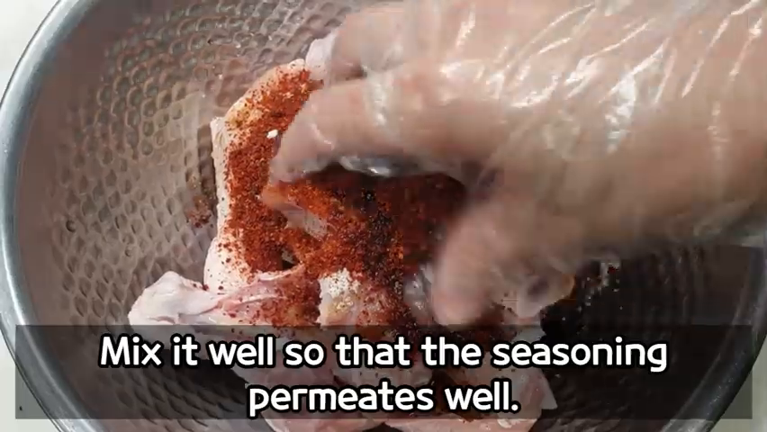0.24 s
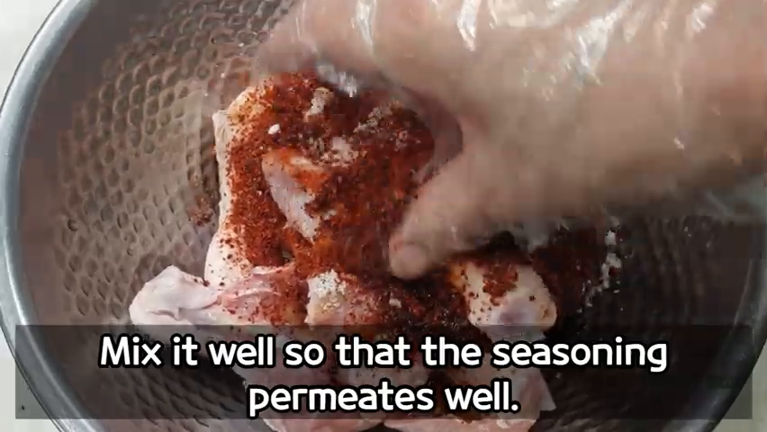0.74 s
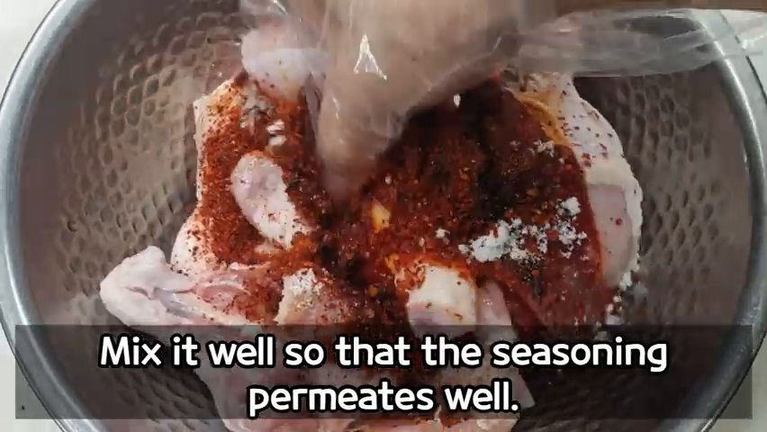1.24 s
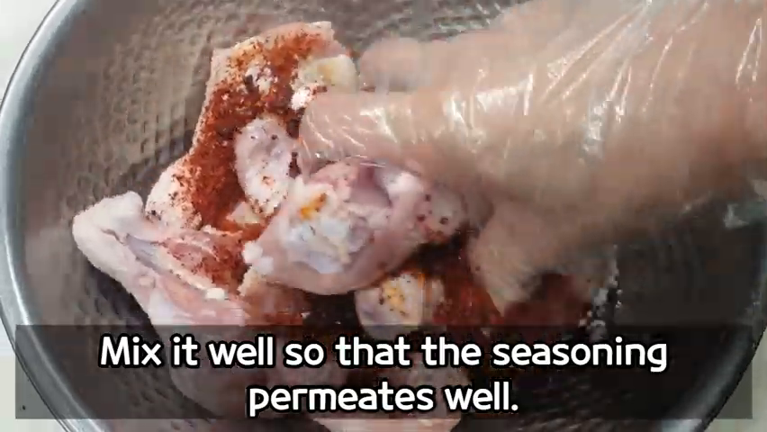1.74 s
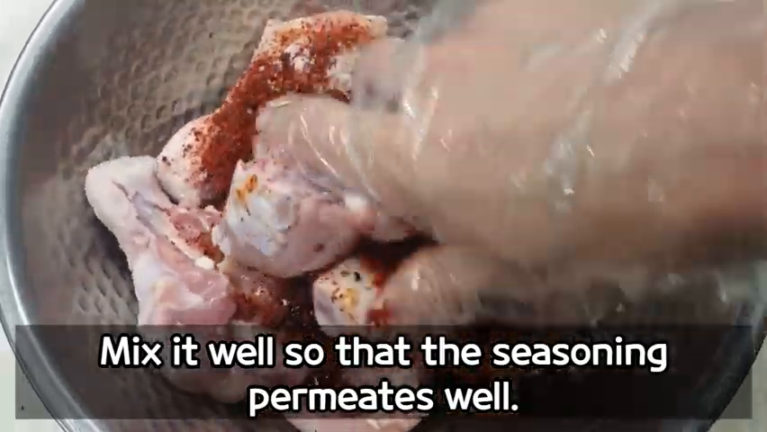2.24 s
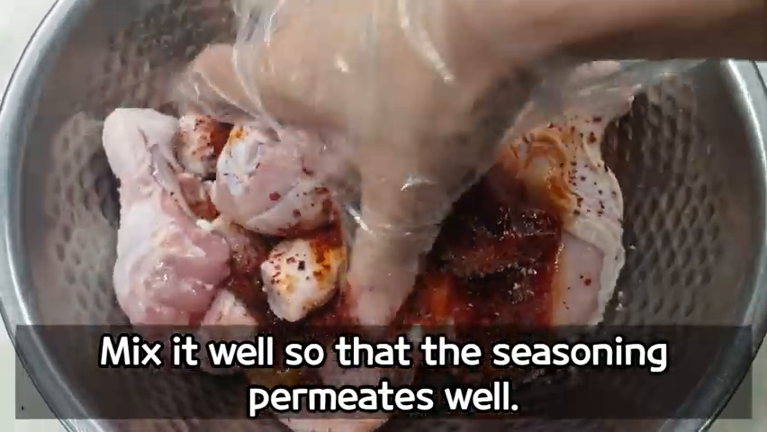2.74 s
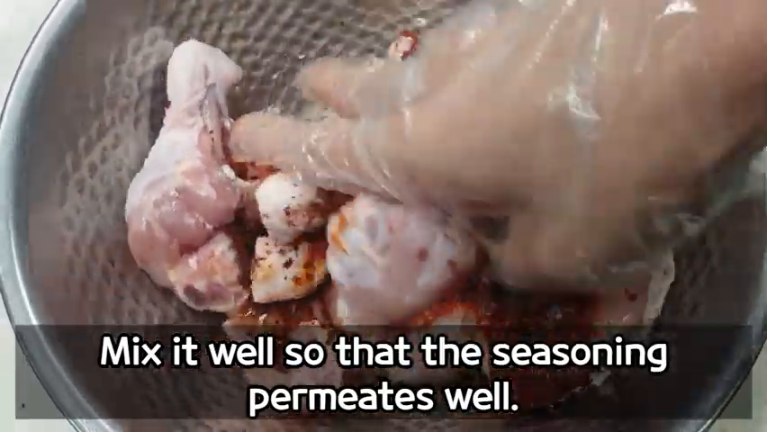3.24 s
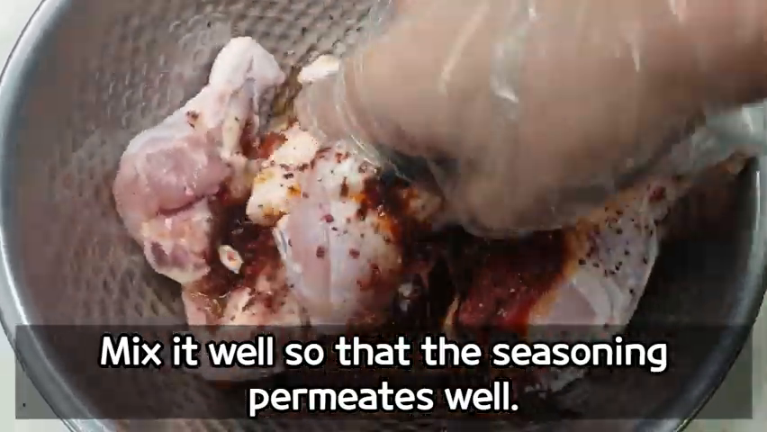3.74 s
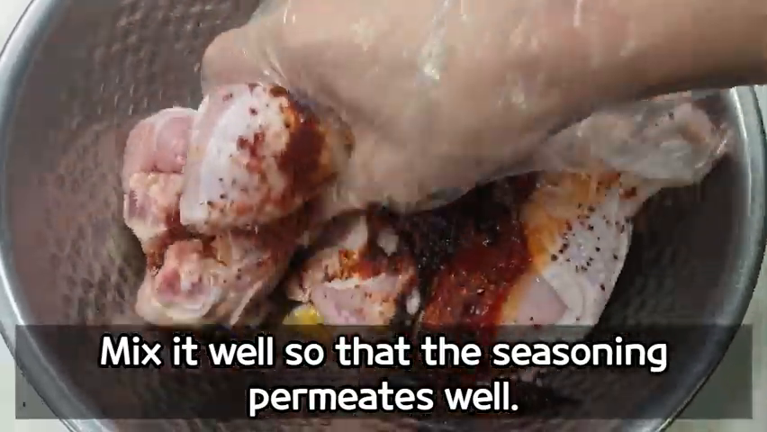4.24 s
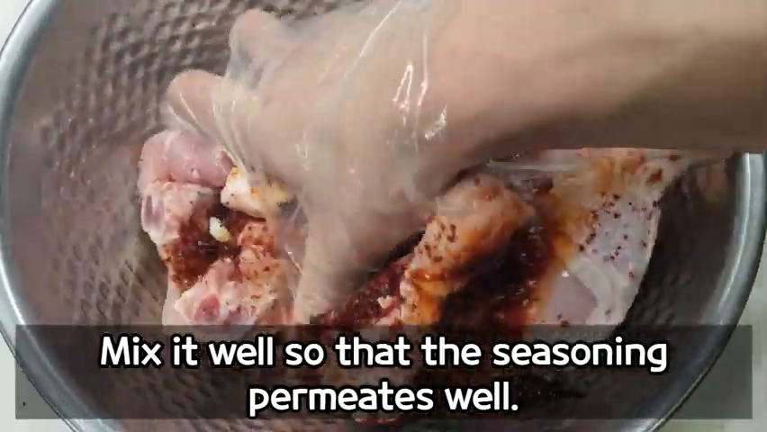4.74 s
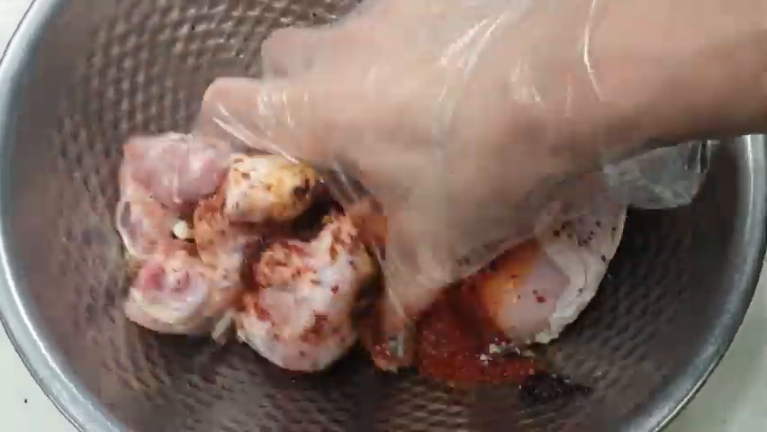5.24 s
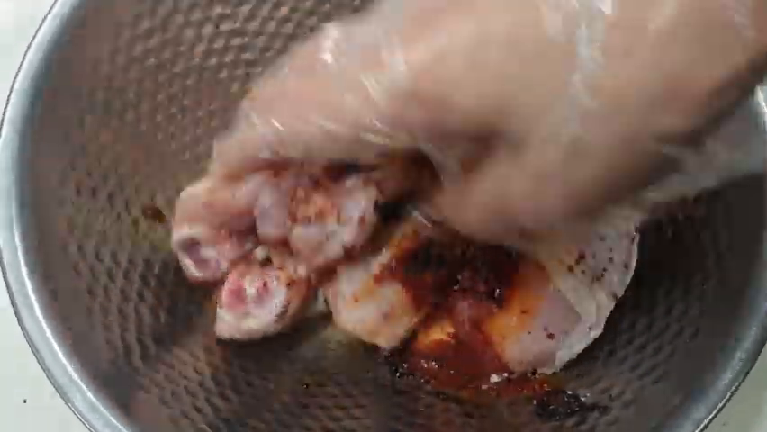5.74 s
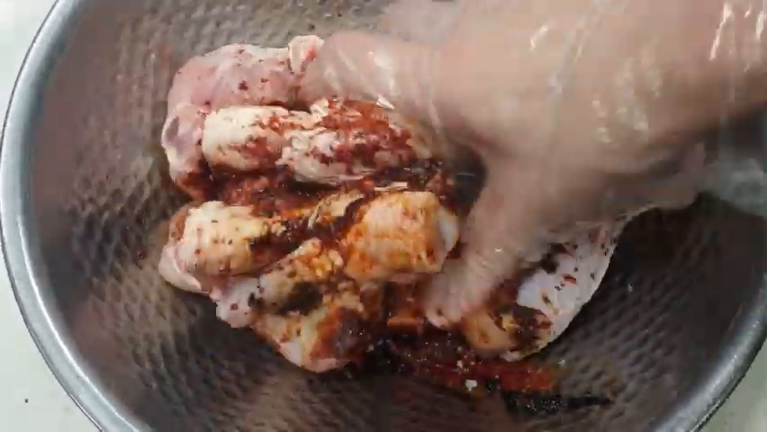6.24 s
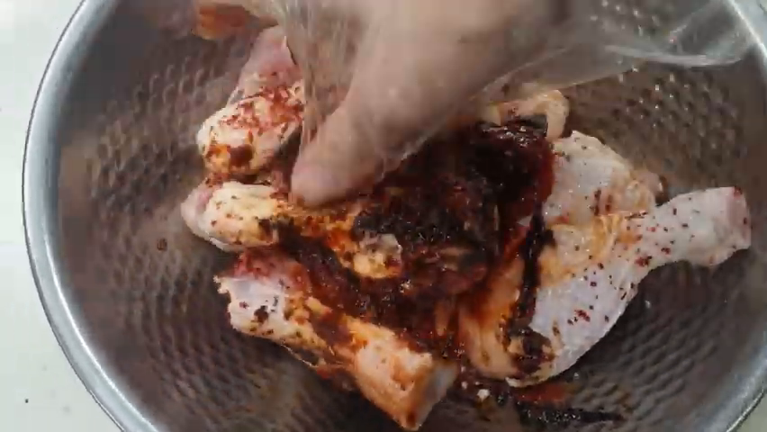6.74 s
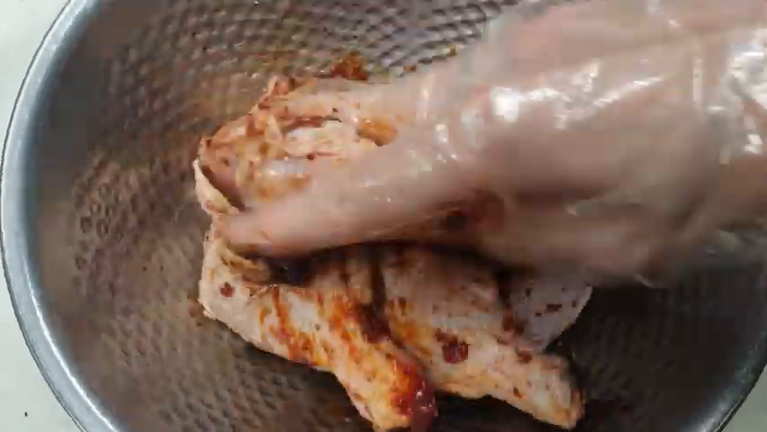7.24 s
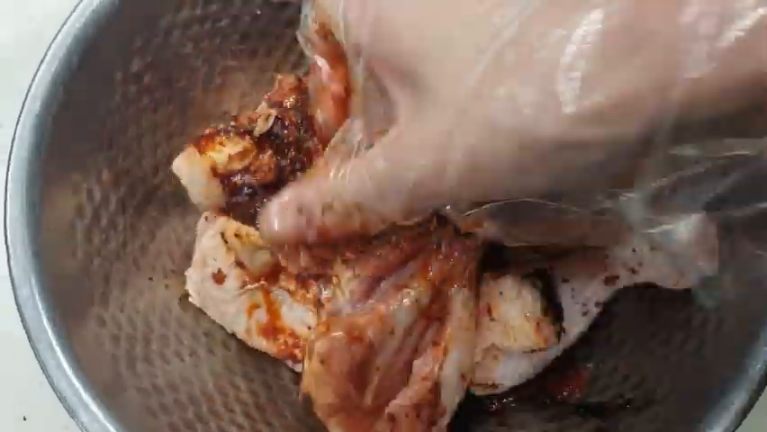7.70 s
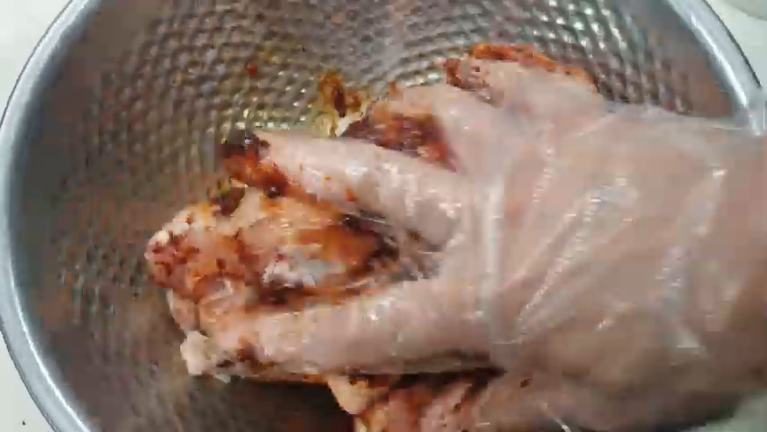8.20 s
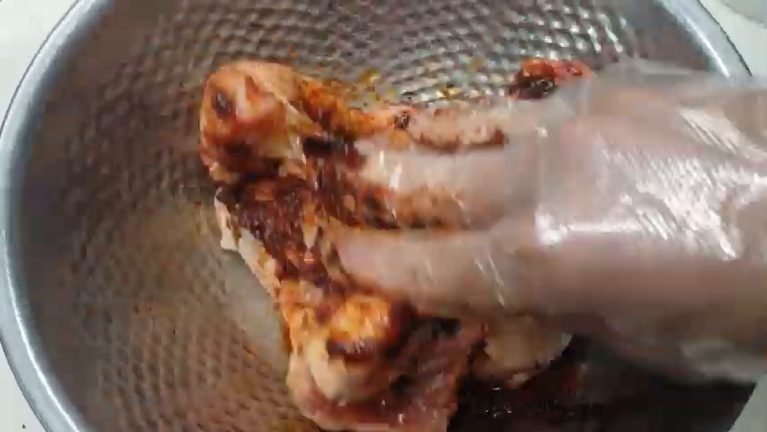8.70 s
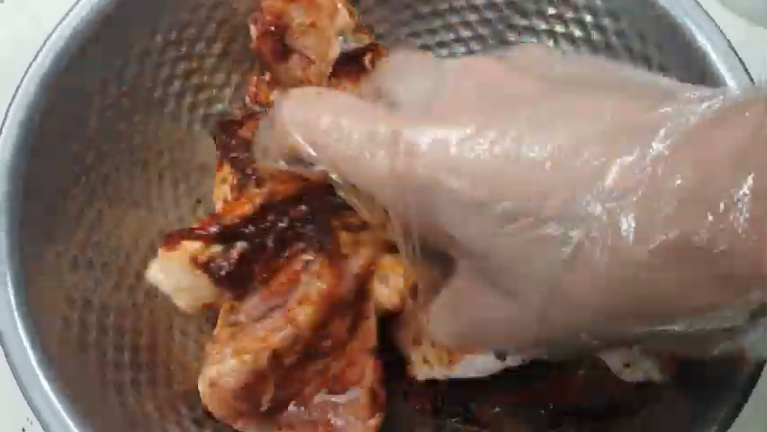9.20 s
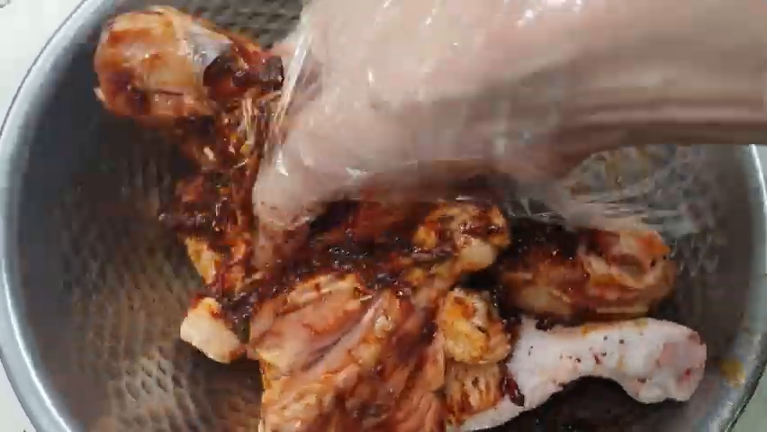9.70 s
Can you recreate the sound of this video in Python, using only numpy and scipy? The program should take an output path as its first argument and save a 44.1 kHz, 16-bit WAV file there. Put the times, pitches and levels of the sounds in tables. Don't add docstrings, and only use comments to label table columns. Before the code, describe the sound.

A plastic-gloved hand kneads raw chicken and wet paste in a steel bowl, with bright crinkling, squelches, smacks and soft low thumps, heard close up.

```python
import sys
import numpy as np
from scipy import signal
from scipy.fft import rfft, irfft
from scipy.io import wavfile
from scipy.ndimage import uniform_filter1d

SR = 44100
rng = np.random.default_rng(int(sys.argv[2]) if len(sys.argv) > 2 else 0)


def volts_from_db(level):
    exponent = np.asarray(level, float) / 20
    return 10 ** exponent


def waveform_to_disk(signal):
    frames = np.transpose(np.atleast_2d(signal))
    scaled = np.clip(frames, -1, 1) * 32767
    samples = np.round(scaled).astype(np.int16)
    wavfile.write(sys.argv[1], SR, samples)


N = 439236

# pitch_hz, likeness (1 = the same)
LIKENESS = [(60, 0.8), (300, 0.8), (540, 0.62), (880, 0.93), (1500, 0.2), (7500, 0.08), (9000, 0.4),
            (15500, 0.12)]
# time_s, crinkle_db
EFFORT = [(0.0, -50.5), (0.6, -53.5), (1.4, -47.5), (2.0, -41), (3.0, -38), (4.0, -38.5), (5.0, -39.5),
          (6.0, -44), (7.0, -38), (8.0, -40.5), (9.0, -42.5), (9.96, -48)]
# peak_s, peak_db, pitch_hz
THUMPS = [(1.197, -31, 101), (2.373, -35.5, 103), (2.829, -35, 92.5), (2.879, -28, 110), (3.417, -28, 112),
          (3.49, -23, 98), (3.541, -30.5, 100), (3.645, -29.5, 102), (4.021, -18, 123.4), (4.049, -18, 100),
          (4.089, -25, 127), (4.581, -23, 119), (4.64, -21.5, 124), (4.838, -25.5, 100), (5.146, -25.5, 97),
          (5.505, -23.5, 97), (5.775, -21.5, 109), (6.248, -33.5, 91), (6.614, -27.5, 105),
          (6.779, -30, 95), (7.021, -28.5, 98), (7.054, -23.5, 103.5), (7.356, -20.5, 119.4),
          (7.57, -30.5, 109), (7.633, -29.5, 92), (7.822, -19.5, 100), (8.564, -28.5, 100),
          (8.874, -26, 95), (9.103, -27.5, 108.4), (9.637, -24.5, 95.7)]
# peak_s, peak_db
SOFT_THUMPS = [(0.962, -38.5), (7.472, -42), (1.051, -38.5), (1.233, -34), (2.799, -34.5), (2.913, -32.5),
               (3.073, -34), (3.208, -41.5), (3.456, -31), (3.602, -31), (4.137, -34), (4.223, -36),
               (4.622, -30), (4.671, -34), (4.787, -29.5), (5.212, -37), (5.625, -41), (5.795, -32),
               (5.979, -39), (6.232, -36), (6.537, -38), (6.854, -38), (6.967, -38), (7.195, -36), (7.262, -36),
               (7.292, -36), (7.324, -32), (2.436, -40), (7.765, -32.5), (9.555, -30.5), (0.272, -52),
               (0.381, -45), (0.92, -44), (1.671, -53), (1.799, -45), (1.95, -50), (2.06, -45), (4.53, -46),
               (6.58, -43), (8.528, -45), (8.599, -44), (8.84, -46), (9.93, -48), (4.75, -38), (4.816, -31),
               (4.873, -30), (4.9, -42), (4.93, -50), (4.701, -39), (5.735, -42), (5.25, -50)]


def at_samples(rows):
    s, *columns = np.transpose(rows)
    return [np.interp(np.arange(N) / SR, s, c) for c in columns]


def at_hz(points, hz):
    table_hz, value = np.array(points).T
    return np.interp(np.log(hz), np.log(table_hz), value)


def rms_one(x):
    return x / np.sqrt(np.mean(x ** 2) + 1e-20)


def mid_rms_one(stereo):
    return stereo / np.sqrt(np.mean(stereo.mean(axis=0) ** 2))


def two_sides(mid, side, alike):
    return np.sqrt(1 + alike) * mid + np.sqrt(1 - alike) * side * [[1], [-1]]


def power_db(*levels_db):
    return 10 * np.log10(sum(volts_from_db(db) ** 2 for db in levels_db))


def add(out, s, sound):
    i = max(round(s * SR), 0)
    out[..., i:i + sound.shape[-1]] += sound[..., :N - i]


def grains(per_s, spread_db, t60):
    place, size = rng.random((2, 4000))[:, :min(round(per_s * N / SR), 4000)]
    bursts = np.full(N, 1e-18)
    bursts[(place * N).astype(int)] = volts_from_db(spread_db * np.minimum(-np.log(1 - size), 2.5))
    fall = volts_from_db(-60 / (t60 * SR))
    swell = volts_from_db(-60 / (0.85 * t60 * SR))
    return rms_one(signal.lfilter([1], np.convolve([1, -fall], [1, -swell]), bursts))


def bands(spectrum, low_hz, top_hz, shared, own_share, per_s, spread_db, cycles, smooth, per_octave=3):
    count = int(per_octave * np.log2(top_hz / low_hz))
    edges = np.geomspace(low_hz, top_hz, count + 1)
    white = rng.standard_normal((2, 2, N))
    out = 0
    for k, (low, high) in enumerate(zip(edges, edges[1:])):
        band = signal.butter(2, [low, high], "band", fs=SR, output="sos")
        mid, side = signal.sosfilt(band, white[k % 2])
        hz = np.sqrt(low * high)
        alike = np.clip(at_hz(LIKENESS, hz), -1, 1)
        own = own_share * grains(per_s, spread_db, cycles / hz)
        gate = np.sqrt(smooth ** 2 + shared ** 2 + own ** 2)
        out = out + volts_from_db(at_hz(spectrum, hz)) * rms_one(gate) * two_sides(mid, side, alike)
    return mid_rms_one(out)


def ringing_clicks(spectrum, low_hz, top_hz, per_s, spread_db, cycles, count):
    sizes = volts_from_db(spread_db * np.minimum(rng.exponential(1, N), 3.5)) * (rng.random(N) < per_s / SR)
    dealt = rng.integers(0, count, N)
    mid, side = rng.standard_normal((2, N))
    out = 0
    for k, hz in enumerate(np.geomspace(low_hz, top_hz, count)):
        alike = np.clip(at_hz(LIKENESS, hz), 0, 1)
        clicks = sizes * (dealt == k) * two_sides(mid, side, alike)
        r, w = volts_from_db(-60 * hz / (cycles * SR)), 2 * np.pi * hz / SR
        ring = signal.lfilter([1, 0, -1], [1, -2 * r * np.cos(w), r * r], clicks + 1e-18)
        out = out + volts_from_db(at_hz(spectrum, hz)) * hz * ring
    return mid_rms_one(out)


def pop(hz, cycles, noisy, t60, swell_s, spread):
    t = np.arange(round(.08 * SR)) / SR
    band = signal.butter(2, [hz / spread, min(hz * spread, .45 * SR)], "band", fs=SR, output="sos")
    mid, side = rms_one(signal.sosfilt(band, rng.standard_normal((2, len(t)))))
    puff = (mid + min(hz / 3000, .8) * side * [[1], [-1]]) * volts_from_db(-60 * t / t60)
    ring = np.sin(2 * np.pi * hz * t) * volts_from_db(-60 * t * hz / cycles)
    return (ring + noisy * puff) * np.minimum(t / swell_s, 1)


def aftermath_db(t60):
    s, db = np.transpose([row[:2] for row in THUMPS + SOFT_THUMPS])
    hits = np.full(N, 1e-18)
    hits[(s * SR).astype(int)] = volts_from_db(db) ** 2
    energy = signal.lfilter([1], [1, -volts_from_db(-120 / (t60 * SR))], hits)
    return 10 * np.log10(uniform_filter1d(energy, size=1500) + 1e-12)


def hand():
    # start_s, hold_s, crinkle_db, squish_db (relative to the crinkle)
    strokes = [(0.212, 0.14, -44.5, -7), (0.45, 0.34, -50, -9.5), (0.755, 0.3, -45.5, -4),
               (0.99, 0.21, -43.5, -4.5), (1.496, 0.36, -43, -7.5), (2.135, 0.31, -42.5, -3.5),
               (2.682, 0.25, -40, -4.5), (3.273, 0.34, -38.5, -2.5), (3.676, 0.18, -38, -8.5),
               (3.924, 0.29, -36.5, -6), (4.332, 0.055, -38, -10), (4.46, 0.36, -36, -6.5),
               (4.88, 0.26, -37.5, -7), (5.411, 0.091, -37, -9), (5.66, 0.27, -39, -7.5),
               (6.043, 0.26, -39, -8.5), (6.446, 0.31, -40.5, -10), (6.732, 0.067, -45, 2),
               (6.998, 0.002, -34, -3), (7.002, 0.26, -40, -26), (7.297, 0.0047, -32.5, -0.5),
               (7.686, 0.034, -37, -3.5), (7.914, 0.075, -41.5, -13), (8.167, 0.18, -40.5, -7),
               (8.455, 0.21, -37, -9.5), (8.728, 0.37, -39, -11), (8.997, 0.2, -41, -4),
               (9.245, 0.32, -39.5, -9), (9.586, 0.14, -43, -2), (9.855, 0.052, -39, -12)]
    attack_s, release_db_per_s = 0.028, 296
    splash_db, splash_t60_s = -20, 0.58
    t = np.arange(0, N, 32) / SR
    effort_db = at_samples(EFFORT)[0]
    s, hold_s, db, wet_db = np.transpose(strokes)[..., None]
    release = volts_from_db(-release_db_per_s * np.clip(t - s - attack_s - hold_s, 0, 1))
    shape = np.clip((t - s) / attack_s, 0, 1) * release
    levels = [10 * np.log10(np.sum((volts_from_db(top_db) * shape) ** 2, axis=0) + 1e-12)
              for top_db in (db, db + wet_db)]
    crinkle_db, squish_db = at_samples(np.transpose([t] + levels))
    rest_db = -57.5 + 1.21 * (effort_db + 46.5)
    splashes_db = splash_db + aftermath_db(splash_t60_s)
    return power_db(effort_db, crinkle_db), power_db(rest_db, squish_db, splashes_db)


def flicks_db(rows, bell_s):
    t = np.arange(0, N, 32) / SR
    s, db = np.transpose(rows)[..., None]
    width_s = bell_s * np.where((db > 0) & (t < s), .7, 1)
    bells = np.exp(-.5 * ((t - s) / width_s) ** 2)
    return np.interp(np.arange(N) / SR, t, np.sum(db * bells, axis=0))


def brief_swings_db():
    # time_s, change_db
    flicks = [(0.673, 5), (1.721, -6.5), (2.07, -4), (2.624, -3.5), (2.719, -5), (2.804, 4), (3.033, -1),
              (3.063, 3), (4.001, 2.5), (4.205, -3), (4.617, 2.5), (5.034, -6.5), (5.128, -1), (5.298, 0),
              (5.368, -5.5), (5.767, 6.5), (6.131, -6.5), (6.216, 2.5), (6.605, 1), (6.705, -5.5),
              (6.74, -6.5), (6.969, -8), (7.189, -6.5), (7.249, 2.5), (7.638, 1.5), (8.291, 5.5),
              (8.326, -5.5), (8.361, 3.5), (8.873, 2), (9.005, -5.5),
              (0.044, -9), (0.06, 0), (0.112, -5), (0.214, -1), (0.653, 0.5), (0.822, -3), (1.074, -0.5),
               (1.113, 1), (1.171, 0), (1.966, 2.5), (2.355, 5), (2.434, -5), (2.62, -1), (3.348, 2.5),
               (3.524, -2), (4.296, 4.5), (4.496, -1.5), (4.673, 1.5), (4.973, -3), (5.96, -6),
               (6.725, 2.5), (7.088, -1), (7.541, -2.5), (7.89, -1), (7.96, 1), (8.584, -2), (8.72, -7),
               (9.071, -0.5), (9.508, -3), (9.774, 2.5)]
    return flicks_db(flicks, .014)


def room_air():
    # pitch_hz, level_db
    air_colour = [(30, -8.5), (70, -25), (404, 1.5), (889, -16), (1760, -50), (7090, 2), (13700, 1.5),
                  (16000, -20)]
    return volts_from_db(-55.5) * bands(air_colour, 25, 17000, 0, 0, 5, 1, 10, smooth=1, per_octave=1.5)


def glove(level_db):
    # pitch_hz, level_db (per Hz)
    film_colour = [(1200, -20), (2100, -11), (4400, -8.5), (7000, -6), (8450, -8), (12800, -5), (15100, -4),
                   (17000, -9)]
    taut_db, slack_db, soak_s = 2.5, -6, 4.3
    folds = grains(200, 4.0, .006)
    creases = grains(90, 2.5, .04)
    creases = creases / (uniform_filter1d(creases, size=3000) + .3)
    shared = 0.75 * np.hypot(folds, 0.9 * creases)
    film = bands(film_colour, 1200, 15440, shared, 0.85, 45, 2.5, 450, smooth=0.55, per_octave=5)
    film = film + volts_from_db(-8) * ringing_clicks(film_colour, 1437, 15100, 1500, 4.0, 25, count=14)
    top = signal.sosfilt(signal.butter(2, 8500, "high", fs=SR, output="sos"), film)
    body = signal.sosfilt(signal.butter(2, 8500, "low", fs=SR, output="sos"), film)
    lift_db = slack_db + (taut_db - slack_db) * np.exp(-np.arange(N) / SR / soak_s)
    return volts_from_db(level_db - 2.5) * (body - volts_from_db(lift_db) * top)


def fold_snaps():
    # time_s, peak_db, pitch_hz
    sharp_snaps = [(0.0607, -24, 13700), (2.6483, -18, 6240), (1.531, -19, 6900), (3.059, -18, 11400),
                   (3.108, -13, 12700), (3.8796, -23, 14300), (3.942, -16, 7440), (3.996, -5.5, 5320),
                   (4.4, -9.5, 12200), (4.606, -8, 5800), (4.904, -20, 7200), (5.0644, -14, 4600),
                   (5.123, -13.5, 6000), (5.255, -17, 12700), (5.2976, -14, 14900), (5.892, -13.5, 7260),
                   (6.1692, -12, 14300), (6.2075, -20, 5200), (6.447, -11.5, 7280), (6.6044, -14.5, 6860),
                   (6.7563, -17, 4760), (6.9985, -17, 6700), (7.1144, -19, 7300), (7.285, -19, 6200),
                   (7.323, -9.5, 7000), (7.631, -18.5, 6500), (7.724, -12.5, 6940), (7.7593, -11, 5760),
                   (8.8717, -23, 13000), (9.276, -16, 11400)]
    # time_s, peak_db, pitch_hz
    creaks = [(0.675, -25, 7100), (0.767, -25, 12200), (0.812, -30, 7050), (0.8947, -23, 7160),
              (0.968, -25, 5800), (1.0804, -34, 6630), (2.2338, -31, 14300), (2.471, -27, 5980),
              (2.6893, -20, 12300), (2.916, -17, 13000), (3.1966, -21, 12600), (3.2545, -29, 14300),
              (3.3014, -29, 6520), (3.3754, -16, 11700), (3.4604, -20.5, 6100), (4.0424, -18, 6600),
              (4.806, -20, 6800), (5.2101, -22, 6700), (5.3413, -22, 13800), (5.471, -29, 6000),
              (5.5732, -26, 11100), (6.0566, -27, 6900), (6.1509, -22, 12200), (6.4287, -42, 7100),
              (6.518, -20.5, 6860), (7.225, -24, 7500), (8.5949, -32, 14500), (8.6173, -38, 12900),
              (8.9845, -29, 11800), (9.699, -28, 6590), (9.901, -30, 6000)]
    # pitch_ratio, level_db
    snap_ratios = [(0.92, 2.5), (0.98, 2.5), (1.116, -2), (1.5, -13)]
    out = np.zeros((2, N))
    for s, db, hz in sharp_snaps + [(s, db + 5.0, hz) for s, db, hz in creaks]:
        crack = volts_from_db(-3.0) * pop(8000, 8, 1.6, .024, .003, 2.6)
        rings = sum(volts_from_db(ring_db) * pop(min(ratio * hz, 15500), 57, 0.29, 0.084, 0.00096, 1.2)
                    for ratio, ring_db in snap_ratios)
        add(out, s, volts_from_db(db - 16.0) * (rings + crack))
    return out


def paste(level_db):
    # pitch_hz, level_db (per Hz)
    paste_colour = [(150, -12), (280, -8.5), (680, -14), (950, 0), (1320, -4), (1700, -5), (2600, -11.5),
                    (5000, -9.5)]
    # time_s, change_db
    paste_swings = [(0.241, 2), (0.489, 9), (0.6, 0), (0.718, 7.5), (0.902, -3), (0.998, 0.5), (1.183, -4.0),
                    (1.247, -3), (1.72, 3), (1.974, -5), (2.051, -6), (2.193, -3), (2.415, -1.5), (2.51, 6.5),
                    (2.586, 6.5), (2.8, 0), (2.909, 5.5), (3.215, -2.5), (3.538, 0.5), (3.662, 3), (4.095, -4),
                    (4.169, 4), (4.516, -4), (5.234, 4), (5.358, 2), (5.507, 3), (5.715, -6), (5.915, 4.5),
                    (6.184, -3), (6.262, 5), (6.324, -5.5), (6.527, 9.5), (7.405, 4), (7.509, 6), (7.665, -7),
                    (8.032, 3), (8.207, 1.5), (8.295, -5), (8.612, 3), (8.796, -1), (8.864, 5.2), (9.129, -5),
                    (9.219, -2), (9.632, 2.5), (9.836, -7)]
    level_db = level_db + flicks_db(paste_swings, 0.016)
    sucks = grains(60, 7.0, 0.06)
    wet = bands(paste_colour, 154.2, 5040, sucks, 1.0, 24, 2.4, 77, smooth=0.81, per_octave=4)
    pockets = ringing_clicks(paste_colour, 257.0, 3310, 250, 2.0, 35, count=16)
    return volts_from_db(level_db - 3.0) * (wet + volts_from_db(-16.0) * pockets)


def rocking():
    # pitch_hz, level_db (per Hz)
    rumble_colour = [(25, -22), (55, 6), (97, 3.5), (150, -5), (230, -12.5), (400, -33)]
    knocking = grains(30, 2.5, .12)
    rest_db = -61 + 0.44 * (at_samples(EFFORT)[0] + 45)
    level_db = power_db(rest_db, -26.5 + aftermath_db(1))
    return volts_from_db(level_db) * bands(rumble_colour, 25, 400, knocking, .5, 15, 3.0, 12, smooth=1.3)


def thumps():
    # pitch_ratio, level_db, swell_s
    landing = [(0.94, -3.5, 0.01686), (0.653, -15.5, 0.033), (1.484, -4, 0.022), (2.19, -15, 0.017),
               (1.159, -5.5, 0.028)]
    settle_s, settle_db, soft_thump_hz = 0.0398, -17, 100
    softness = 3.05
    out = np.zeros(N)
    t = np.arange(round(.22 * SR)) / SR
    settles = [(s + settle_s, db + settle_db, hz) for s, db, hz in THUMPS]
    blows = THUMPS + settles + [(s, db, soft_thump_hz) for s, db in SOFT_THUMPS]
    for (s, db, hz), chance in zip(blows, rng.random((len(blows), 10))):
        for k, (ratio, mode_db, rise_s) in enumerate(landing):
            swell = (t / rise_s * np.exp(1 - t / rise_s)) ** softness
            swing = np.sin(2 * np.pi * (ratio * hz * t + chance[k]))
            vary_db = 10 * (k > 0) * (chance[5 + k] - 1.5)
            add(out, s - landing[0][2], volts_from_db(db + mode_db + vary_db) * swell * swing)
    return out * volts_from_db([[1.7], [-1.7]])


def needles():
    # time_s, peak_db
    film_clicks = [(2.6487, -13), (2.7814, -32), (3.0565, -28), (3.8634, -27), (3.9948, -19), (4.1394, -12),
                   (4.1454, -11), (4.1584, -7), (4.168, -9), (4.459, -12), (4.7556, -26), (7.428, -24),
                   (4.126, -18), (4.152, -12), (4.175, -16), (3.4785, -20), (0.795, -31), (0.906, -26),
                   (1.103, -29), (6.38, -19), (6.478, -22)]
    out = np.zeros((2, N))
    for s, db in film_clicks:
        add(out, s, volts_from_db(db - 6.5) * pop(4300, 2.5, 0.26, 0.01, 0.0001, 1.5))
    return out


def bone_knocks():
    # time_s, peak_db, pitch_hz
    bone_hits = [(1.188, -32, 358), (2.782, -30, 720), (2.815, -33, 284), (2.82, -30, 776),
                 (8.574, -48, 189), (4, -24, 147), (3.056, -44, 274), (3.408, -27, 284), (3.47, -38, 420),
                 (3.599, -42, 302), (3.991, -26.5, 226), (4.569, -30, 305), (4.6, -26.5, 320),
                 (5.12, -45, 279), (5.761, -29.5, 276), (5.791, -45, 227), (7.109, -35, 230),
                 (7.163, -33.5, 320), (7.256, -30, 278), (7.332, -22, 255), (7.463, -32.5, 260),
                 (7.757, -37, 440), (8.554, -32.5, 213)]
    out = np.zeros((2, N))
    for s, db, hz in bone_hits:
        add(out, s, volts_from_db(db - 3.0) * pop(hz, 14.0, 0.25, 0.21, 0.0027, 1.88))
    return out


def smacks():
    # time_s, peak_db, pitch_hz
    wet_smacks = [(1.189, -28, 1210), (2.864, -19.5, 1110), (3.056, -23, 1060), (3.407, -27.5, 750),
                  (3.476, -14, 1100), (3.612, -30, 1020), (3.994, -21, 880), (4.018, -13.5, 1570),
                  (4.053, -25.5, 846), (4.119, -19, 1570), (4.205, -22, 1020), (4.268, -28, 1530),
                  (4.603, -31, 1090), (4.711, -18, 1940), (4.739, -25, 1200), (4.772, -20.5, 1570),
                  (4.842, -20.5, 990), (4.909, -28, 1070), (5.124, -21, 980), (5.189, -25, 1130),
                  (5.762, -31, 970), (5.792, -17.5, 1090), (6.447, -25, 2160), (7.037, -23, 900),
                  (7.334, -18, 945), (7.831, -36, 1080), (8.982, -25, 1490), (9.171, -26.5, 1370),
                  (9.552, -29, 920), (9.662, -32, 950)]
    out = np.zeros((2, N))
    for s, db, hz in wet_smacks:
        add(out, s, volts_from_db(db - 3.0) * pop(hz, 19.3, 0.34, 0.046, 0.0021, 1.29))
        add(out, s + 0.00154, volts_from_db(db - 3.0) * pop(1.48 * hz, 8.3, 0.16, 0.0076, 0.00035, 1.8))
    return out


def air_pocket_ticks():
    # time_s, peak_db, pitch_hz
    wet_ticks = [(2.0204, -30, 4300), (2.163, -31, 3570), (3.044, -29, 2900), (3.4092, -30, 3740),
                 (3.7778, -39, 4170), (3.8638, -30, 2900), (4.0412, -31, 4150), (4.116, -28, 2840),
                 (4.5421, -26, 4070), (4.6209, -30, 1880), (4.879, -30, 2830), (5.7615, -26, 4190),
                 (5.7904, -33, 3500), (5.8292, -28, 3460), (5.891, -33, 2270), (6.152, -32, 3460),
                 (6.167, -28, 3450), (6.2073, -40, 2860), (6.4712, -28, 3480), (6.76, -32, 4400),
                 (6.8778, -30, 3170), (7.046, -22, 4330), (7.3063, -33, 3770), (7.3243, -27, 3780),
                 (7.419, -26, 1910), (7.527, -33, 4280), (7.7194, -27, 3500), (7.9498, -30, 3570),
                 (7.995, -29, 4060), (8.3384, -34, 4000), (8.3577, -28, 4200), (8.7465, -39, 3140),
                 (8.767, -32, 3740), (8.983, -29, 3900), (9.212, -29, 3380), (9.384, -32, 4240),
                 (3.439, -28, 1720), (3.478, -30, 2470), (3.6153, -28, 2460), (3.6472, -27, 1730),
                 (4.016, -19, 1780), (4.131, -27, 2320), (4.149, -24, 2100), (4.162, -28, 2600),
                 (4.2697, -27, 1930), (5.8397, -29, 2710), (6.5353, -34, 2960), (7.343, -20, 1380),
                 (7.392, -29, 1030), (7.402, -33, 1150), (7.506, -34, 1000), (2.864, -33, 2300),
                 (3.057, -30, 2300), (4.177, -42, 960)]
    out = np.zeros((2, N))
    for s, db, hz in wet_ticks:
        add(out, s, volts_from_db(db - 4.0) * pop(hz, 30, 0.51, 0.048, 0.00097, 1.22))
    return out


def slaps():
    # time_s, peak_db
    wet_slaps = [(2.863, -29), (3.057, -28), (3.459, -23), (3.477, -26), (3.647, -35), (3.995, -33),
                 (4.016, -13.5), (4.119, -35), (4.207, -35), (4.27, -39), (4.603, -15), (4.843, -34),
                 (5.124, -27), (5.792, -21), (7.036, -28), (7.335, -20), (7.462, -23.5), (8.611, -31)]
    out = np.zeros((2, N))
    for s, db in wet_slaps:
        slap = pop(950, 5.0, .15, .012, .0004, 1.8)
        slap = slap + .8 * pop(1750, 7.0, .2, .012, .0004, 1.6)
        slap = slap + .45 * pop(2600, 7.0, .3, .01, .0003, 1.5)
        slap = slap + .5 * pop(520, 3.0, .2, .015, .0006, 1.6)
        add(out, s, volts_from_db(db - 1) * slap)
    return out


def two_ports(sound):
    # pitch_hz, left_minus_right_db
    left_lead = [(60, 4.5), (240, 3.5), (480, 6.5), (900, 2), (1600, 5.5), (7200, 8), (8700, .5),
                 (15500, 9.5)]
    # pitch_hz, phase_radians
    left_phase = [(600, 0), (950, .4), (1290, 1.4), (1800, 2.8), (4000, 2.6), (5000, 0), (16000, 0)]
    hz = np.maximum(np.fft.rfftfreq(N, 1 / SR), 1)
    lean = volts_from_db(at_hz(left_lead, hz) / 2)
    ports = np.array([lean * np.exp(1j * at_hz(left_phase, hz)), 1 / lean])
    return irfft(rfft(sound) * ports, N)


def scene():
    glove_db, paste_db = hand()
    swing_db = brief_swings_db()
    film = glove(glove_db + swing_db) + fold_snaps() + needles()
    wet = paste(paste_db + 0.78 * swing_db) + smacks() + air_pocket_ticks() + slaps()
    bowl = rocking() + bone_knocks()
    return two_ports(room_air() + film + wet + bowl) + thumps()


def low_pass(x):
    return signal.sosfilt(signal.butter(12, 16810, fs=SR, output="sos"), x)


def record(dry):
    top_cut = signal.ellip(14, .3, 85, 15980, fs=SR, output="sos")
    return low_pass(signal.sosfilt(top_cut, dry))


dry = scene()
out = record(dry)
waveform_to_disk(out)
```